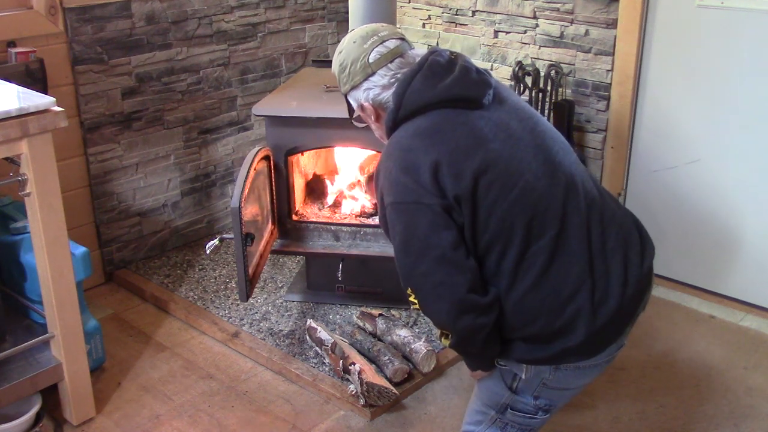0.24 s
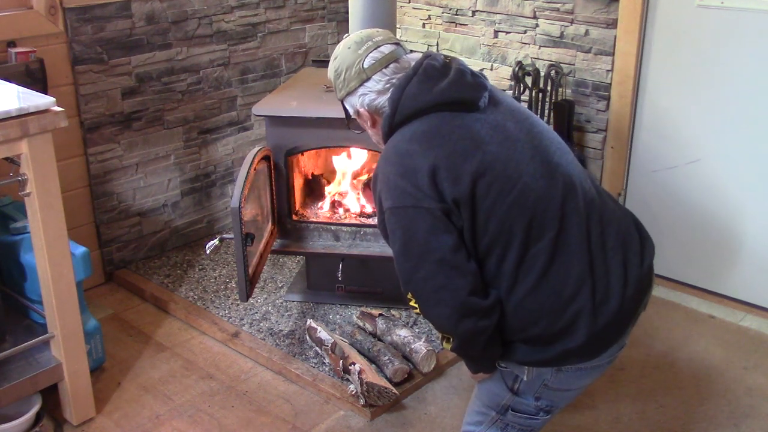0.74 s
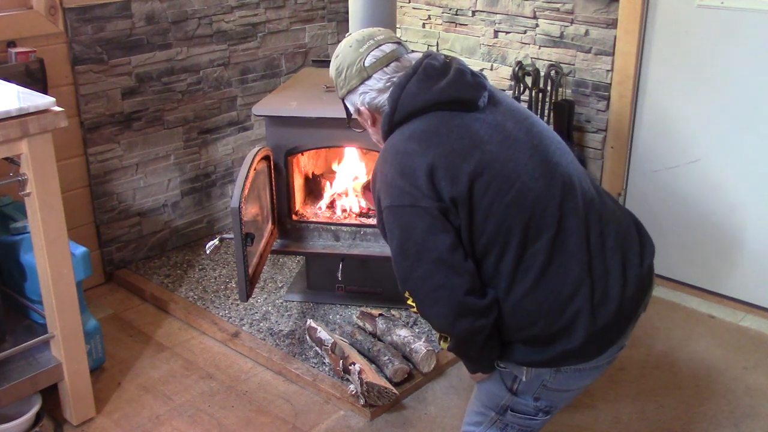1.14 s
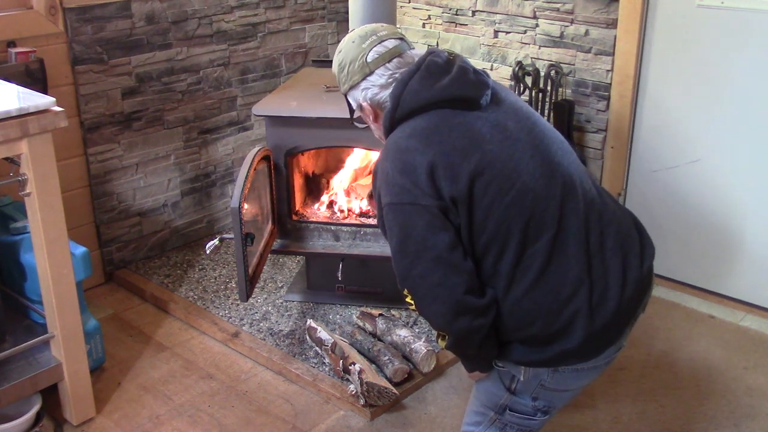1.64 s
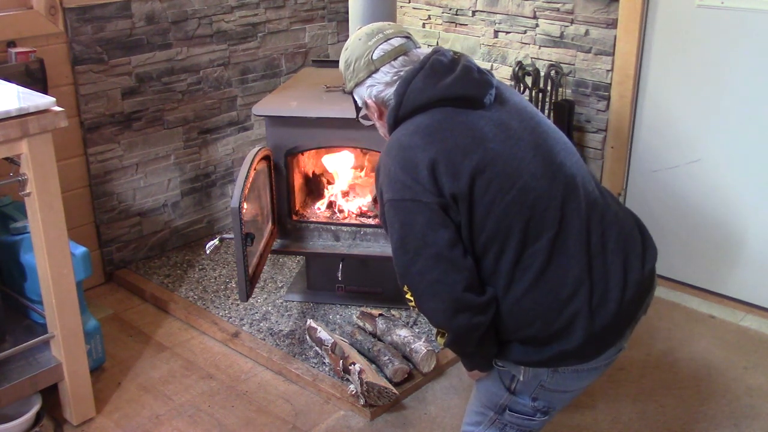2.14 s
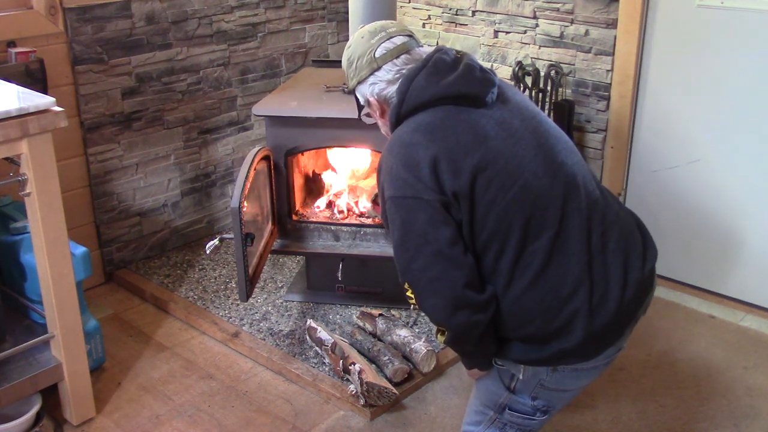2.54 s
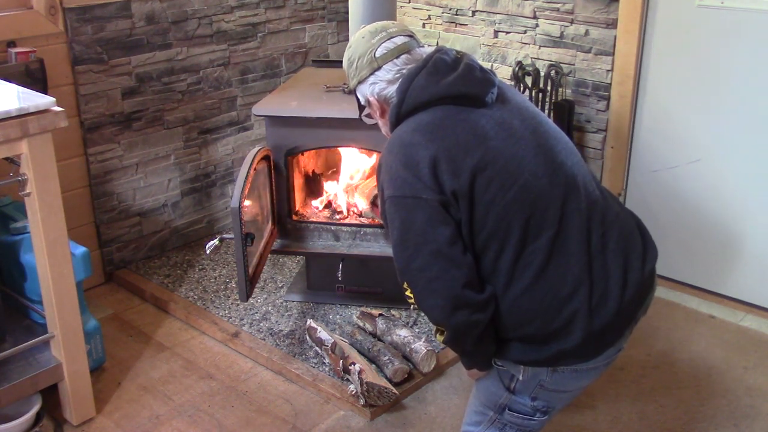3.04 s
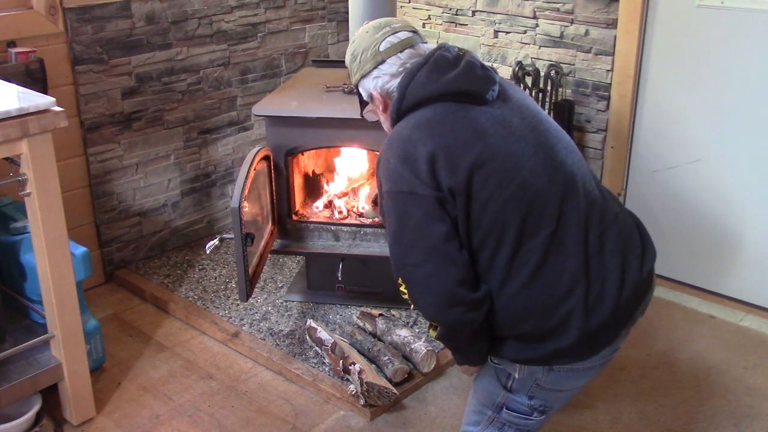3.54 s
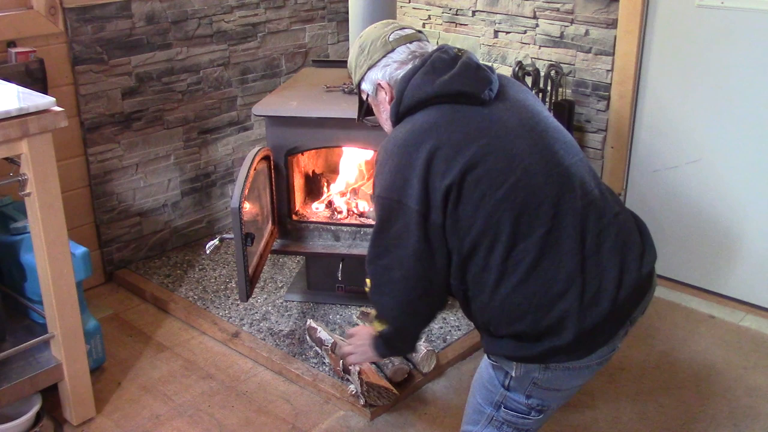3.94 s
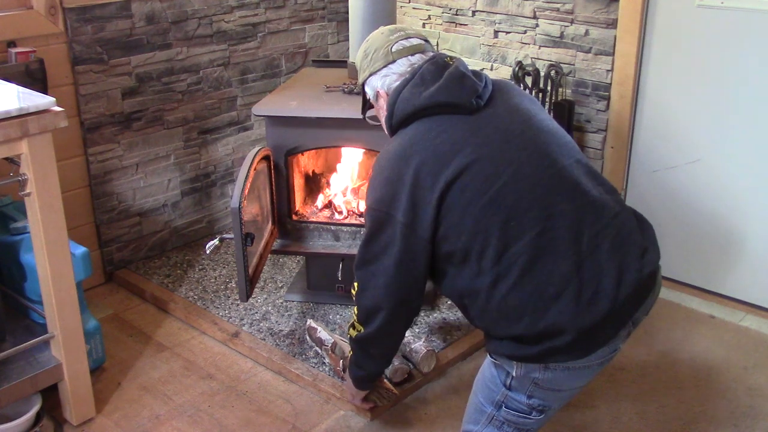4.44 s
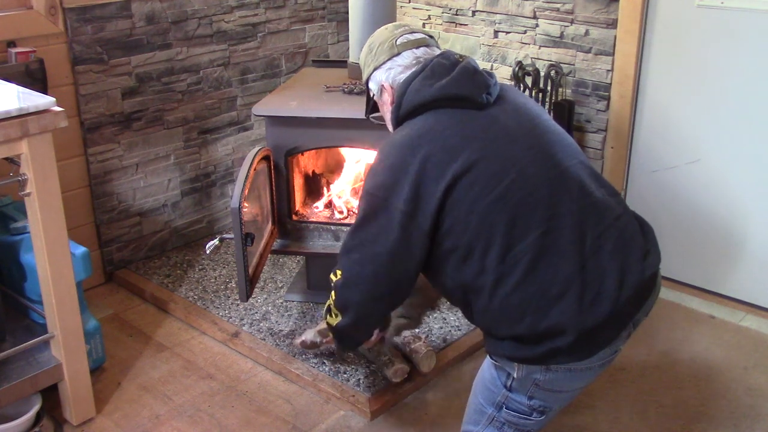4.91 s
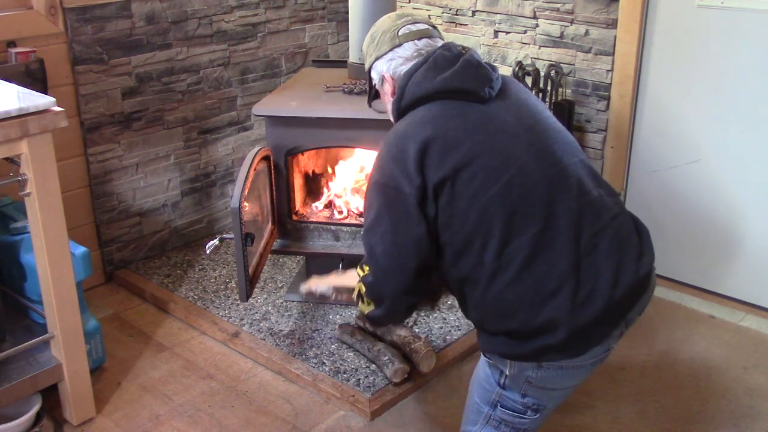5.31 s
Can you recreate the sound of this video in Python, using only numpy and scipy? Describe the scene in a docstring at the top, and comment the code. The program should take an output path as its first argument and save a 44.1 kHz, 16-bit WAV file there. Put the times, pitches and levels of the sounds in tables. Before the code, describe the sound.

Close to an open wood stove: a ringing log thud, fluttering flames, snaps, a startling sharp pop, then busy crackling and small wood knocks.

```python
"""A small cabin room, close to an open iron wood stove: a log thunks in and the plates ring on.
The fire hisses, flutters, snaps and pops once loudly; a foot shifts on the boards and split logs knock.
Blows are sums of dying sines with a dull push of noise; snaps are sharp breaks through a broad resonance.
Hiss, flames and embers are shaped noise; a short room tail and a small stereo microphone colour it all."""
import sys
import numpy as np
from scipy import signal
from scipy.fft import rfft, irfft
from scipy.io import wavfile
from scipy.ndimage import uniform_filter1d

SR = 44100
rng = np.random.default_rng(int(sys.argv[2]) if len(sys.argv) > 2 else 0)


def dump(signal):
    """Clip the signal to [-1, 1] and save it as 16-bit WAV at the path in sys.argv[1]."""
    limited = np.clip(np.atleast_2d(signal).T, -1, 1)
    pcm = np.round(limited * 32767).astype(np.int16)
    wavfile.write(sys.argv[1], SR, pcm)


N = 245637

# Log landing in the stove and settling: (time [s], ring level [dB], thud level [dB])
LOG_THUNKS = [(.112, -34.5, -21.5), (.124, -30.5, -26.5), (.150, -41, -28.5), (0.189, -48, -33)]
# Modes of the iron stove plates: (frequency [Hz], relative level [dB], 60 dB decay time [s])
STOVE_MODES = [(120, 1, 0.17), (171.3, -6.5, 2.1), (184.4, 8, 0.39), (225, -16, 6), (218, 4, 0.31),
               (272, -22, 5.2), (284.6, -20.5, 9.1), (307.4, 0.5, 0.84), (324, -17, 3.6), (368, -23, 0.25),
               (432, -13.5, 1.7), (431, 1.5, 0.35), (471, -8.5, 2.05), (580, -17, 1.3), (623, -28, 0.56),
               (667, -23.5, 2.4), (658, -2, 0.26), (739.3, -19, 2.56), (754, -21, 0.2), (784, -22, 0.23),
               (970, -28, 7.9), (920, -28.5, 0.28), (1054, -7, 0.71), (1374, -15, 0.3)]
# Colour of a dull thud, wood on iron: (frequency [Hz], relative level [dB])
THUD_COLOUR = [(60, -35), (120, -26), (190, -1.5), (300, 6), (600, -3.5), (1200, -14.5), (2500, -20.5),
               (8000, -40.5)]
# Snaps of wood and bark that stand out: (time [s], peak level [dB], centre [Hz], room share [dB])
WOOD_SNAPS = [(0.5318, -24, 8000, -4), (0.9174, -34.5, 8900, -8), (1.2924, -36, 6200, 3),
              (1.354, -51, 7000, -12), (1.4146, -42, 7040, -14), (1.596, -38.5, 8900, -7),
              (1.7052, -34, 6730, -7), (1.7198, -31, 8840, -9), (1.7436, -25, 7920, -28),
              (1.8798, -38, 7900, -19), (1.936, -34.5, 8300, -16), (1.9864, -33.5, 7560, -12),
              (1.9953, -36, 8200, -6), (2.0155, -29.5, 8260, -19), (2.0384, -31.5, 4400, -18),
              (2.084, -31, 7650, -9), (2.1191, -26, 8800, -11), (2.125, -31.5, 7800, -12),
              (2.14, -32, 6840, -12), (2.1856, -32, 6500, -16), (2.196, -31.5, 9690, -14.5),
              (2.2172, -33.5, 7040, -18), (2.2573, -2, 7200, -5.5), (2.291, -19.5, 6040, 3.5),
              (2.5475, -17.5, 4200, -8), (2.75, -39, 11000, -20), (2.764, -19, 7760, -15),
              (2.776, -21, 7800, -7), (2.8377, -27.5, 6500, -12), (2.8475, -30.5, 5770, -5),
              (3.017, -34, 8700, -13), (3.0444, -31, 7650, -12), (3.0703, -39, 8000, -16),
              (3.1548, -34.5, 8440, -17), (3.1834, -32, 8400, -12), (3.1934, -34, 8800, -19),
              (3.2007, -38, 7200, -19), (3.269, -43, 6300, -10), (3.3128, -22, 6900, -10),
              (3.3434, -32, 8050, -2), (3.376, -35, 5900, -3), (3.4589, -39, 9500, -8),
              (3.466, -38.5, 6500, -19), (3.5158, -35.5, 9000, -16), (3.6549, -37, 7000, -11),
              (3.666, -33, 4670, -11), (3.6742, -37, 6700, -14.5), (3.7223, -33, 8200, -9),
              (3.757, -32.5, 6970, -11), (3.8135, -33, 9250, -16), (3.8182, -39, 8400, -10),
              (3.8717, -35, 8850, -1), (3.91, -37, 8400, -12), (4.0023, -36, 8700, -2),
              (4.054, -31, 7050, -13), (4.0545, -22, 8600, -10), (4.076, -20, 10000, -11),
              (4.1772, -31.5, 6450, -18), (4.2099, -35.5, 7900, -5), (4.3349, -21.5, 7550, -10),
              (4.3828, -24, 5600, -20), (4.3955, -29, 6700, -16), (4.4906, -25.5, 5250, -18),
              (4.5067, -31, 7100, -23), (4.5294, -31, 4670, -2), (4.5452, -30, 7300, -12),
              (4.5581, -27, 6300, -4), (4.565, -32.5, 6000, -4), (4.635, -29, 8700, -28),
              (4.6573, -32, 7300, -6), (4.707, -30, 9000, -9), (4.7137, -27, 6900, -24),
              (4.7321, -31.5, 6940, -10), (4.7832, -31.5, 3820, -2.5), (4.817, -25, 8230, -3),
              (4.8243, -27.5, 6050, -13), (4.888, -27, 7888, -17), (4.9042, -29.5, 7340, -13),
              (4.9218, -29.5, 8800, -7), (4.9347, -32.5, 8030, -12), (4.961, -31.5, 7700, -5),
              (5.0077, -20.5, 6670, -14), (5.014, -32, 7000, 0), (5.0611, -21.5, 7300, -8),
              (5.1134, -30, 6000, -6), (5.1186, -32, 7600, -16), (5.161, -31, 6200, -8),
              (5.1768, -31, 6550, -22), (5.1817, -16, 4900, -7), (5.2658, -21, 7960, -13),
              (5.283, -33, 8600, -15.5), (5.2916, -24.5, 10000, -19), (5.318, -32, 5800, -10),
              (5.3763, -32, 8550, -15.5), (5.3876, -33, 7280, -18), (5.4306, -26.5, 8200, -27),
              (5.456, -27.5, 3220, -6.5), (5.4805, -24.5, 8440, -22.5), (5.54, -27.5, 7900, -25)]
# Woody knocks and pops: (time [s], peak level [dB], pitch factor, ring time factor,
# treble tilt [dB per octave], room share [dB])
WOOD_KNOCKS = [(2.186, -42.5, 0.83, 2.3, -17, 4.5), (2.2571, -5.5, .99, 1.1, 0, -2),
               (2.5473, -31, 1.34, 0.48, -1, 2.5), (4.0753, -42, 1.2, 1.3, 5, 10.5),
               (4.092, -43, 1.38, 4, -6, 4), (4.283, -48, 3, 3, -22, -11), (4.306, -51.5, 2.89, 4.1, -8, 4),
               (4.3823, -32, 1.02, 0.74, 10, 2), (4.439, -42, 5.8, 0.49, -9, 3),
               (4.9614, -36, 1.59, 0.94, -3, 7.5), (5.1444, -40.5, 1.9, 0.48, 0, 11),
               (5.1815, -24, 1.69, 0.45, 13, 0.5), (5.312, -37, 2.17, 0.87, -2, 7.5),
               (5.4564, -30.5, 1.24, 1.6, 4, 0.5)]
# Modes of a small log before each knock's factors: (frequency [Hz], relative level [dB], 60 dB decay [s])
LOG_MODES = [(464, -30, 0.055), (557, 7.5, 0.021), (751, 9, 0.015), (973, 15, 0.0055), (1510, 13, 0.0026),
             (2180, 4.5, 0.0039)]
# Bright clinks on iron or stone: (time [s], peak level [dB], pitch factor, ring time factor)
CLINKS = [(0.3827, -39, 1, 1), (.431, -46, 1, 1), (.530, -25, 1, 1.2), (2.2573, -10, 1.63, .16),
          (5.1817, -31, .97, .7), (5.456, -28, 1.12, .35)]
# Modes of a clink before each clink's factors: (frequency [Hz], relative level [dB], 60 dB decay [s])
CLINK_MODES = [(2446, -23, 0.024), (2404, -7, 0.39), (2574, 8, 0.025), (2590, -6, 0.019)]
# Boards answering the loud pop and a shifting foot: (time [s], ring level [dB], thud level [dB])
BOARD_BLOWS = [(2.258, -25, -62), (4.578, -38.5, -46), (4.605, -29, -54), (4.649, -34, -55),
               (4.71, -41, -63)]
# Modes of the floor boards: (frequency [Hz], relative level [dB], 60 dB decay time [s])
BOARD_MODES = [(62.6, 0, 0.29), (91, -21, .16), (129, 4.5, 0.4), (145, 7.5, 0.13), (178, -27, 0.3),
               (213, -1, 0.28), (261, -2.5, 0.15), (360, -16, 0.27), (464, -31, 0.15)]
# Swells of hiss, from steam and from sleeves brushing: (time of top [s], level [dB],
# rise over 20 dB [s], fall over 20 dB [s], extra treble [dB])
HISS_SWELLS = [(0.1, -42, .1, 0.25, 0.5), (0.33, -52.5, 0.56, 0.55, 2.5), (0.6, -50.5, 0.12, 0.18, -3),
               (0.82, -49.5, 0.36, 0.13, 3), (1.094, -58, 0.12, 0.077, -2), (1.198, -50.5, 0.083, 0.06, 5),
               (1.308, -53.5, 0.074, 0.24, -3.5), (1.547, -62, 0.14, 0.13, 4), (1.75, -61, 0.27, 1, 2),
               (2.19, -50.5, 0.11, 0.071, 2), (2.495, -53, 0.79, 0.66, 0.5), (3.0, -56, 0.6, 0.12, 1),
               (3.197, -61, 0.44, 0.58, 0), (3.517, -62.5, 0.19, 0.1, 1), (3.672, -54, 0.19, 0.17, -2),
               (3.868, -62, 0.13, 0.29, 1), (4.213, -56, 0.14, .25, -2), (4.296, -50, 0.078, 0.41, -1.5),
               (4.44, -53, 0.05, .2, -2), (4.56, -49.5, 0.17, 0.15, -3), (4.662, -63, 0.117, 0.033, 0),
               (4.79, -52.5, 0.081, 0.25, -1), (4.83, -52, .1, 0.22, -3), (4.98, -52, 0.067, 0.13, -7),
               (5.12, -50, 0.16, 0.14, -4), (5.324, -52, 0.087, 0.44, -2), (5.51, -44.5, 0.0091, 0.13, 6.5)]
# Colour of the swelling hiss: (frequency [Hz], relative level [dB])
HISS_COLOUR = [(500, -10), (900, 1.5), (1500, -5), (2500, -4.5), (4000, -4), (7000, -5), (11000, -9),
               (15500, -6.5), (16100, -42)]
# Flutter of the flames: (time [s], level [dB])
FLAME_FLUTTER = [(0, -53), (.1, -46), (.3, -46), (.47, -49), (.56, -46), (.9, -52.5), (1.3, -55.5),
                 (1.65, -55), (2.05, -57), (2.2, -53), (3.0, -53.5), (3.1, -56.5), (3.45, -56.5),
                 (3.8, -55), (4.04, -58.5), (4.1, -51), (4.35, -61.5), (4.6, -49), (4.75, -58),
                 (4.9, -54.5), (5.3, -56.5), (5.57, -55.5)]
# Colour of the flames: (frequency [Hz], relative level [dB])
FLAME_COLOUR = [(15, -49), (25, -38), (54, 2), (129, 6), (352, -0.5), (405, 2.5), (604, 1), (1170, -10),
                (1370, -6.5), (2010, -15.5), (3000, -13.5), (3900, -67), (6600, -120)]
# Colour of the embers' steady, duller hiss: (frequency [Hz], relative level [dB])
EMBER_COLOUR = [(500, -17), (1000, 6), (2500, -5.5), (5000, 1.5), (9000, -15.5), (12000, -16), (15500, -6),
                (16100, -45)]
# Likeness of the fire in the left and right channels: (frequency [Hz], likeness [0 to 1])
FIRE_LIKENESS = [(25, .998), (15000, .998)]
# Decay of the cabin room: (frequency [Hz], 60 dB decay time [s])
ROOM_DECAY = [(150, 0.16), (530, 0.32), (1400, .32), (3700, 0.23), (8000, 0.16), (14000, 0.072)]
# Colour of the room tail, its treble swallowed by soft walls: (frequency [Hz], relative level [dB])
ROOM_COLOUR = [(100, 3.5), (400, -2), (2000, -1), (6000, 4), (14000, -10)]
# Response of the small microphone: (frequency [Hz], gain [dB])
MIC_RESPONSE = [(20, -40), (60, -24.5), (110, -5), (3200, 1), (4100, 0.5), (5100, -1.5), (6000, 1),
                (7300, -0.5), (8600, 5.5), (10500, 2), (11700, 1), (12600, -5), (14000, -1), (16000, -14)]
# Colour of each capsule's own steady noise: (frequency [Hz], relative level [dB])
CAPSULE_COLOUR = [(12, -49), (20, -14.5), (342, 2.5), (393, 1.5), (478, 2), (2540, -11), (5850, -18),
                  (11400, -31), (15500, -27)]

SNAP_SHARPNESS, CRACKLE_SHARPNESS = 0.67, 0.98  # Q of the resonance that colours the break
CRACKLES_PER_S, CRACKLE_DB, CRACKLE_SPREAD_DB = 240, -68.5, 4
# Steam after a snap: level for a 0 dB snap, change per dB of snap, 60 dB decay [s]
SIZZLE_DB, SIZZLE_PER_DB, SIZZLE_T60_S = -42, 0.6, 0.42
TREBLE_HZ = 6500  # the hiss above this is the treble
EMBERS_DB, CAPSULE_DB = -68, -63.5  # rms levels, embers ahead of the microphone
CEILING, EDGE_HZ = 0.85, 16650  # soft limit of the amplitude; upper band limit


def stove_thunks():
    """Each blow of the log sets the iron plates ringing and pushes out a dull thud."""
    out = np.zeros(N)
    plates = stove_ring()
    for s, ring_db, thud_db in LOG_THUNKS:
        add(out, s, amp(ring_db) * plates)
        add(out, s, thud(thud_db, t60=0.37))
    return out


def stove_ring():
    """Many close plate modes crowd each listed one, so it swells and fades by chance as it dies."""
    t = np.arange(3 * SR) / SR
    knots = np.arange(0, 3.1, 0.045)
    settling = 1 - np.exp(-(t / 0.11) ** 2)  # the wavering grows after the blow
    out = np.zeros(len(t))
    for mode in STOVE_MODES:
        chance = rng.standard_normal(len(knots))
        waver = 1 + 0.73 * np.interp(t, knots, chance) * settling
        out += waver * ring([mode], 3)
    return out * (1 - np.exp(-t / 0.0016))  # bark cushions the blow


def thud(db, t60):
    """A dull push of dying noise with a soft start."""
    t = np.arange(SR // 2) / SR
    hz = np.fft.rfftfreq(len(t), 1 / SR)
    chance = rng.standard_normal(len(t))
    dull = evened(irfft(rfft(chance) * amp(read(THUD_COLOUR, hz)), len(t)))
    return amp(db - 60 * t / t60) * (1 - np.exp(-t / 0.0053)) * dull


def snap(burst, hz, sharpness):
    """One sharp break and a few milliseconds of dying splinters, coloured by one broad resonance."""
    crack = 0.23 * burst * amp(-60 * np.arange(len(burst)) / SR / 0.0057)
    crack[0] = -1
    b, a = signal.iirpeak(hz, sharpness, SR)
    coloured = signal.lfilter(b, a, signal.lfilter(b, a, crack))
    return peaked(coloured + 0.074 * np.diff(crack, prepend=0))  # the rest stays raw and bright


def wood_snaps(near, far):
    """Burning wood and bark break sharply, each with its own share of the room."""
    for s, db, hz, room_db in WOOD_SNAPS:
        sound = amp(db) * snap(rng.standard_normal(400), hz, SNAP_SHARPNESS)
        add(near, s, sound)
        add(far, s, amp(room_db) * sound)


def wood_knocks(near, far):
    """A struck log rings briefly in a few modes, tilted duller or brighter blow by blow."""
    thin = signal.butter(4, 330, "high", fs=SR)  # a small log radiates no bass
    for s, db, factor, lasting, tilt_db, room_db in WOOD_KNOCKS:
        struck = [(hz, mode_db + tilt_db * np.log2(hz / 560), t60) for hz, mode_db, t60 in LOG_MODES]
        body = ring(struck, 1 / 8, factor, lasting)
        sound = amp(db) * peaked(signal.lfilter(*thin, body))
        add(near, s, sound)
        add(far, s, amp(room_db) * sound)


def clinks(near, far):
    """Iron or stone rings high and briefly when touched."""
    for s, db, factor, lasting in CLINKS:
        sound = amp(db) * peaked(ring(CLINK_MODES, 1 / 2, factor, lasting))
        add(near, s, sound)
        add(far, s, amp(-9.5) * sound)


def board_blows():
    """The loud pop and a shifting foot set the floor boards ringing, each with a soft thud."""
    out = np.zeros(N)
    boards = peaked(ring(BOARD_MODES, 1))
    for s, ring_db, thud_db in BOARD_BLOWS:
        add(out, s, amp(ring_db) * boards)
        add(out, s, thud(thud_db, t60=0.18))
    return out


def fire():
    """The fire's continuous sound: swelling hiss, fluttering flames, embers and small crackles."""
    return swelling_hiss() + flames() + embers() + amp(CRACKLE_DB) * evened(crackles())


def swelling_hiss():
    """Noise split at the treble edge, each part following its own swells."""
    hiss = noise(HISS_COLOUR, patchy_db=0.6, flicker_db=2.0, size=256)
    treble = signal.filtfilt(*signal.butter(2, TREBLE_HZ, "high", fs=SR), hiss)
    low_gain, treble_gain = hiss_gains()
    return low_gain * (hiss - treble) + treble_gain * treble


def hiss_gains():
    """The swells and the steam after each snap add up in power: gains below and above the treble edge."""
    t = np.arange(0, N / SR + 0.002, 0.001)
    s, db, rise, fall, treble_db = np.transpose(HISS_SWELLS)[..., None]
    swells = amp(db - 20 * np.maximum((s - t) / rise, (t - s) / fall)) ** 2
    s, db = np.transpose(WOOD_SNAPS)[:2, :, None]
    steam_db = SIZZLE_DB + SIZZLE_PER_DB * db - 60 * abs(t - s) / SIZZLE_T60_S
    sizzle = (((t > s) * amp(steam_db)) ** 2).sum(0)
    low_power = swells.sum(0) + sizzle
    treble_power = (swells * amp(treble_db) ** 2).sum(0) + sizzle
    return [np.interp(np.arange(N) / SR, t, np.sqrt(power)) for power in (low_power, treble_power)]


def flames():
    """Low turbulent noise whose level flutters."""
    s, db = np.transpose(FLAME_FLUTTER)
    gain = amp(np.interp(np.arange(N) / SR, s, db))
    return gain * noise(FLAME_COLOUR, patchy_db=0.7, flicker_db=0.7, size=1024)


def embers():
    """A hiss of constant mean level with a slight flicker."""
    return amp(EMBERS_DB) * noise(EMBER_COLOUR, patchy_db=0.0, flicker_db=1.3, size=512)


def crackles():
    """Small breaks come by chance, in six pitches and uneven sizes."""
    strength = amp(CRACKLE_SPREAD_DB * np.minimum(rng.exponential(1, N), 4))
    sizes = strength * (rng.random(N) < CRACKLES_PER_S / SR)
    kind = rng.integers(0, 6, N)
    out = np.zeros(N)
    for k, hz in enumerate(np.geomspace(6500, 12500, num=6)):
        one = snap(rng.standard_normal(300), hz, CRACKLE_SHARPNESS)
        out += signal.oaconvolve(sizes * (kind == k), one)[:N]
    return out


def room(x):
    """Sparse taps of random sign, each band dying at its own speed; both channels get nearly the same tail."""
    taps = np.zeros((2, SR // 2))
    slots = np.arange(60, SR // 2 - 20, 10)
    at = slots + rng.integers(0, 10, (2, len(slots)))
    np.put_along_axis(taps, at, rng.choice([-1., 1.], at.shape), 1)
    hz, t, z = signal.stft(taps, SR, nperseg=256)
    decay_db = read(ROOM_COLOUR, hz)[:, None] - 60 * t / read(ROOM_DECAY, hz)[:, None]
    mid, side = signal.istft(z * amp(decay_db), SR, nperseg=256)[1]
    tail = np.array([mid + 0.094 * side, mid - 0.083 * side]) / np.linalg.norm(mid)
    return signal.fftconvolve(x[None], tail, axes=1)[:, :N]


def ring(modes, seconds, factor=1, lasting=1):
    """Dying sines, all set off by one blow."""
    t = np.arange(round(seconds * SR)) / SR
    out = np.zeros(len(t))
    for hz, db, t60 in modes:
        decay = amp(db - 60 * t / max(t60 * lasting, 0.003))
        out -= decay * np.sin(2 * np.pi * hz * factor * t)
    return out


def noise(spectrum, patchy_db, flicker_db, size, likeness=FIRE_LIKENESS):
    """Random short-time spectra with drifting patches and a flicker common to all bands, in stereo."""
    frames, hz = 4 * N // size + 5, np.fft.rfftfreq(size, 1 / SR)
    a, b, c, d, patches = rng.standard_normal((frames, len(hz), 5)).T
    patches = uniform_filter1d(patches, size=8, axis=0)  # across frequency
    patches = evened(uniform_filter1d(patches, size=12, axis=1))  # across time
    flicker = evened(uniform_filter1d(rng.standard_normal(frames), size=4))
    same = read(likeness, hz)[:, None]
    left, other = a + 1j * b, c + 1j * d
    z = np.array([left, same * left + np.sqrt(1 - same ** 2) * other])
    z *= amp(read(spectrum, hz)[:, None] + patchy_db * patches + flicker_db * flicker)
    return evened(signal.istft(z, nperseg=size, noverlap=3 * size // 4)[1][:, :N])


def amp(db):
    """Decibels to amplitude."""
    return 10 ** (np.asarray(db) / 20)


def evened(x):
    """Scale to an rms of one."""
    return x / np.sqrt(np.mean(x ** 2) + 1e-20)


def peaked(x):
    """Scale to a peak of one."""
    return x / (abs(x).max() + 1e-20)


def read(points, hz):
    """Read a curve between its points on a log frequency axis."""
    f, value = np.transpose(points)
    return np.interp(np.log(hz + 1), np.log(f + 1), value)


def add(mix, s, sound):
    """Lay a sound into the mix at s seconds."""
    part = mix[round(s * SR):][:len(sound)]
    part += sound[:len(part)]


def scene():
    """Direct sound at left and right, then the room tail and the fire behind it."""
    near, far = np.zeros((2, N))  # direct sound; what is sent into the room
    wood_snaps(near, far)
    wood_knocks(near, far)
    clinks(near, far)
    blows = stove_thunks() + board_blows()
    left = near + blows
    right = amp(0.53) * left + 0.175 * np.gradient(near)  # the slope changes the treble at right
    return np.array([left, right]) + room(far + amp(-24) * blows) + fire()


def record(dry):
    """A soft ceiling, the small microphone's colour as a causal filter, its own noise and the band limit."""
    log_gain = np.log(amp(read(MIC_RESPONSE, abs(np.fft.fftfreq(8192, 1 / SR)))))
    minimum_phase = -signal.hilbert(log_gain).imag
    colour = np.fft.ifft(np.exp(log_gain + 1j * minimum_phase)).real[:4096]
    limited = CEILING * np.tanh(dry / CEILING)
    heard = signal.oaconvolve(limited, colour[None])[:, :N]
    unlike = [(20, 0), (20000, 0)]  # the two capsules' noises are independent
    heard = heard + amp(CAPSULE_DB) * noise(CAPSULE_COLOUR, 0, 0, size=2048, likeness=unlike)
    band_limit = signal.firwin(511, EDGE_HZ, window=("kaiser", 9), fs=SR)
    return signal.oaconvolve(heard, band_limit[None], "same")


dry = scene()
out = record(dry)
dump(out)
```